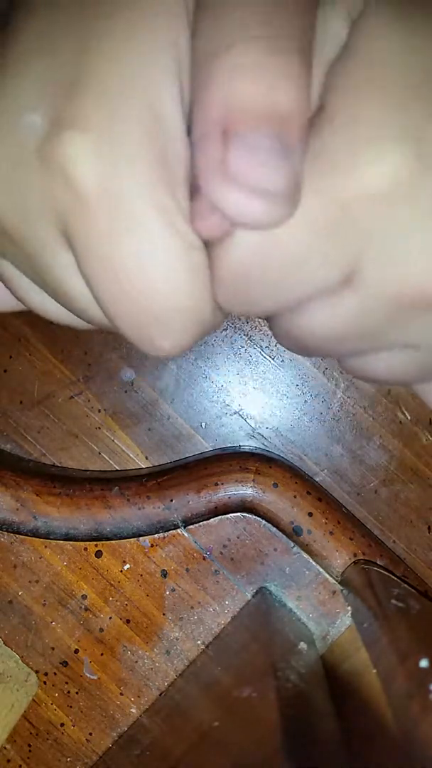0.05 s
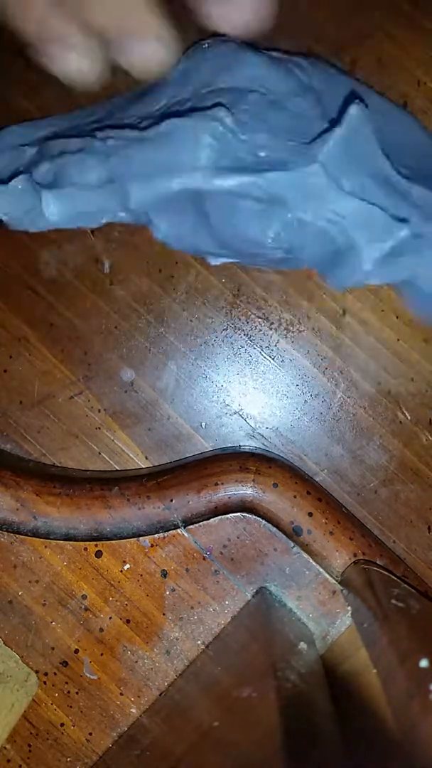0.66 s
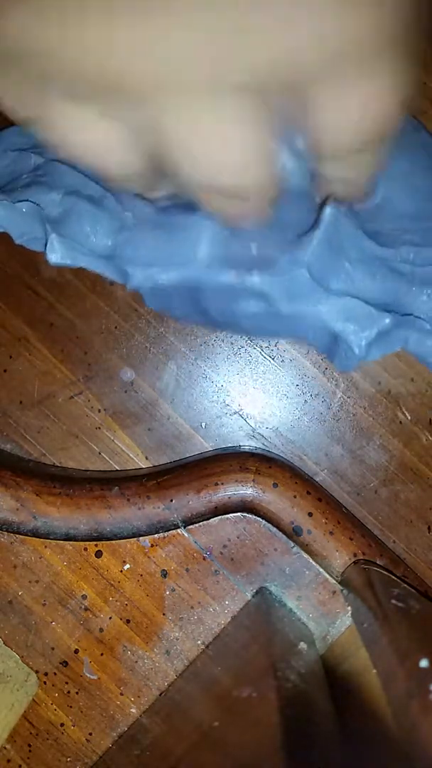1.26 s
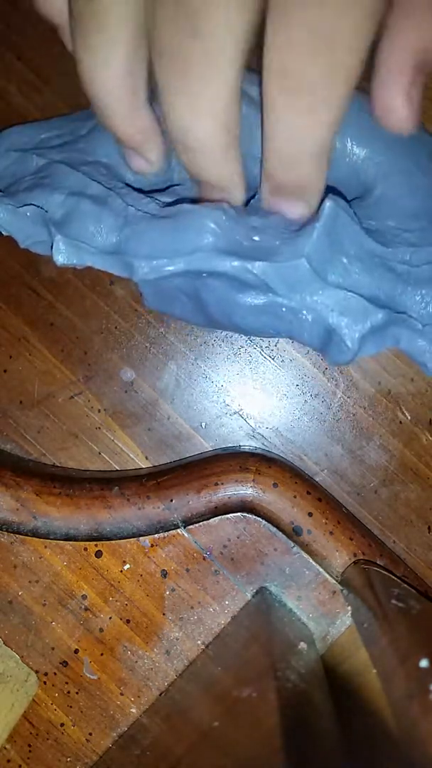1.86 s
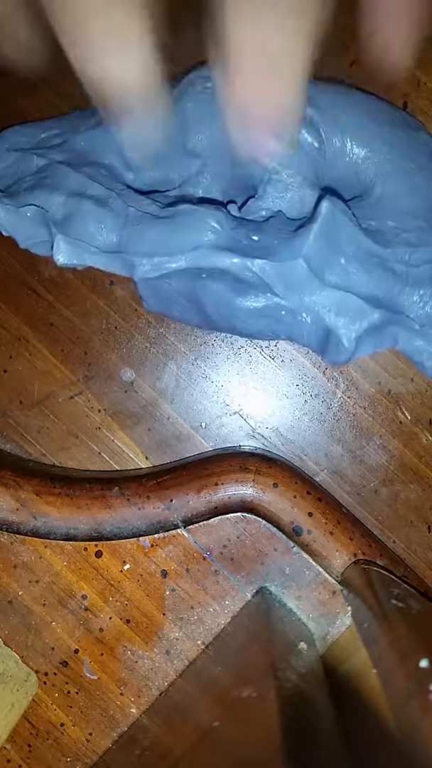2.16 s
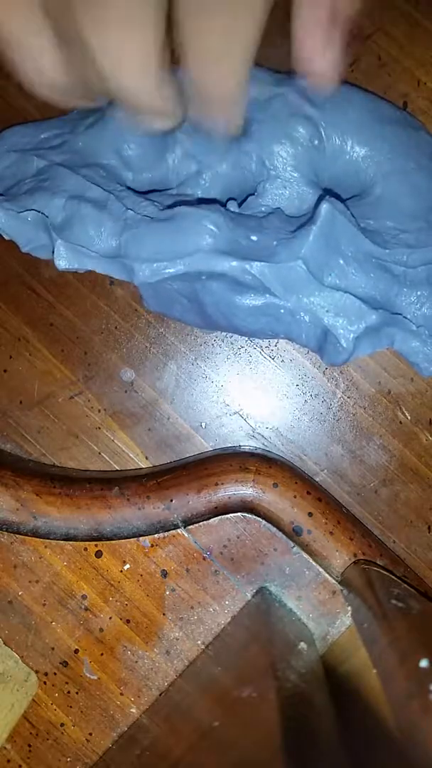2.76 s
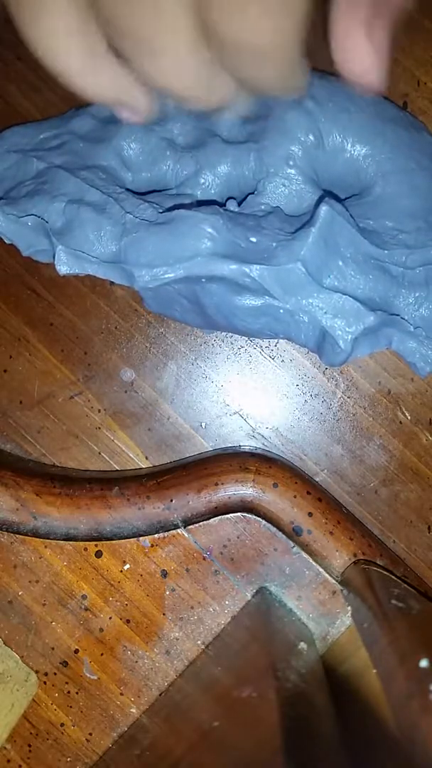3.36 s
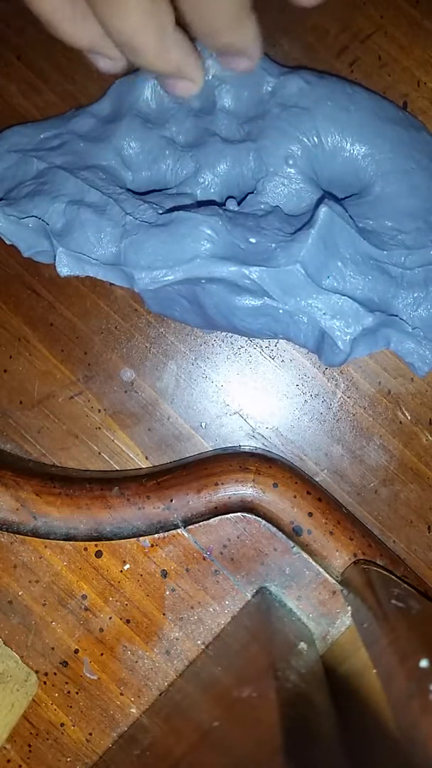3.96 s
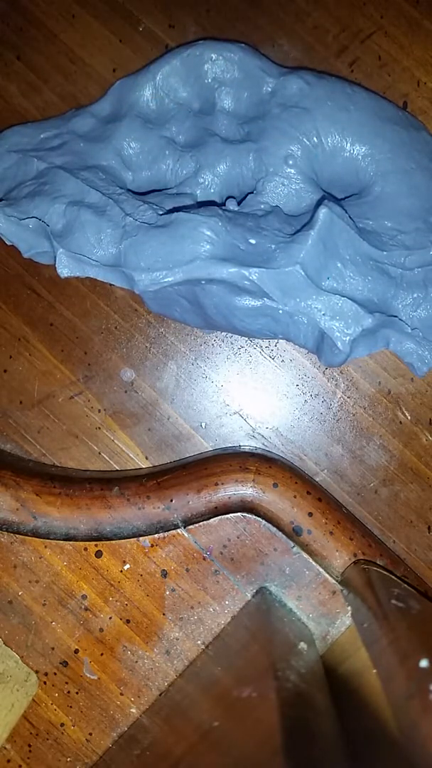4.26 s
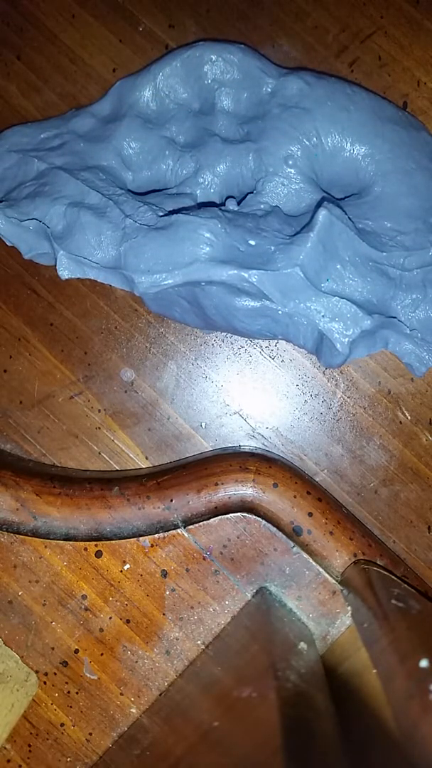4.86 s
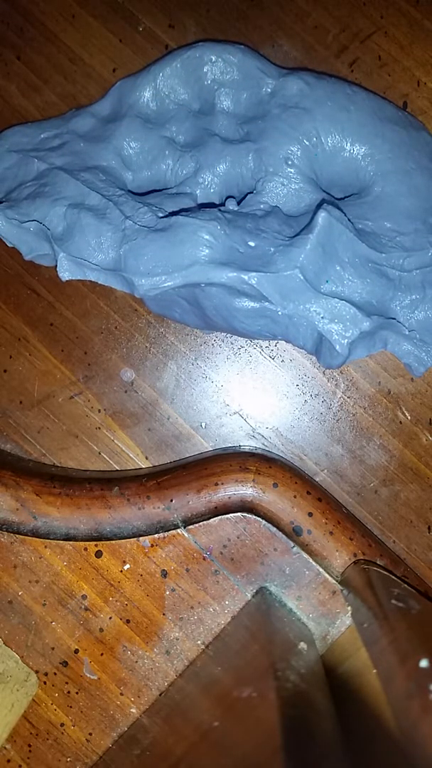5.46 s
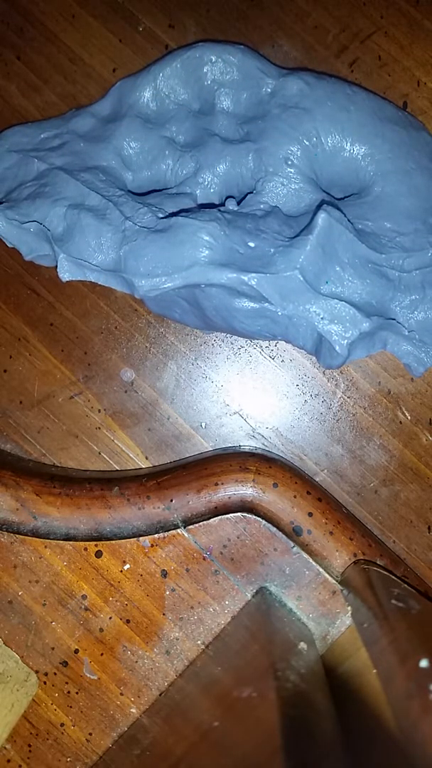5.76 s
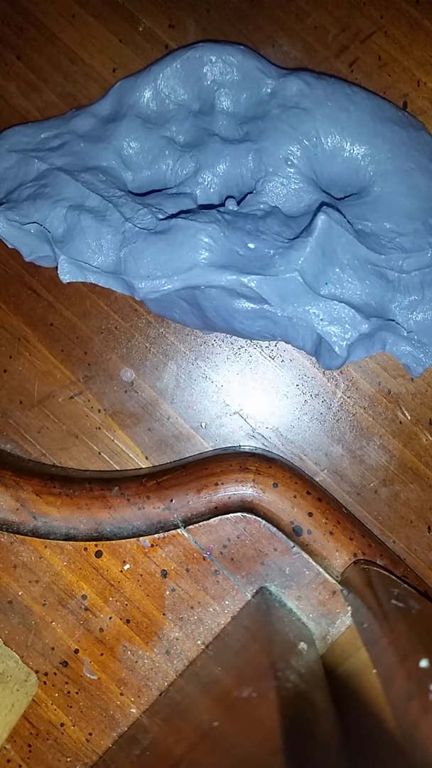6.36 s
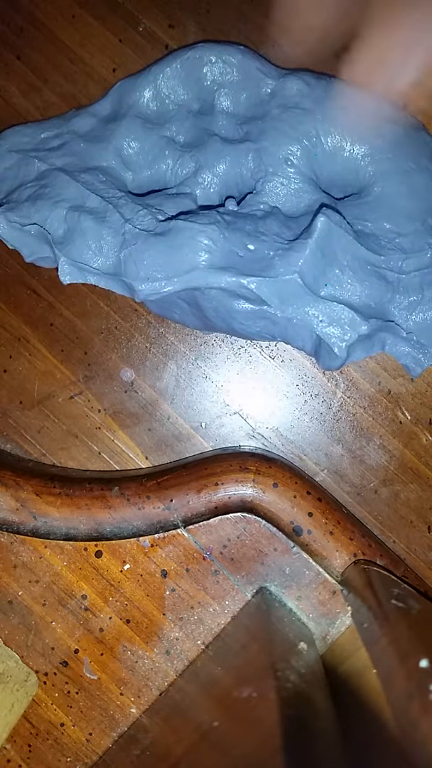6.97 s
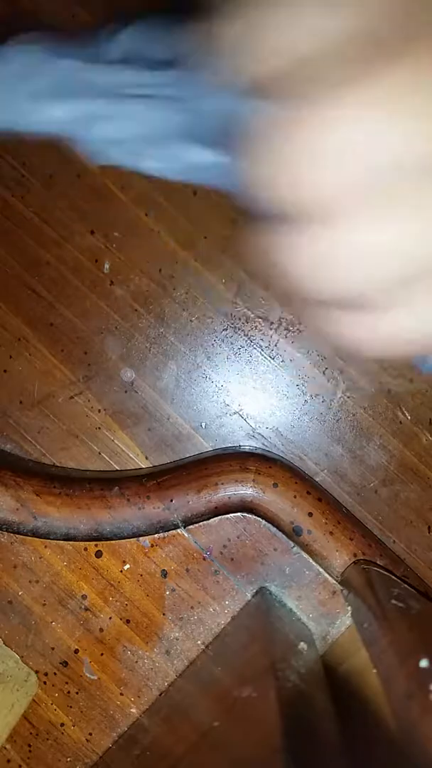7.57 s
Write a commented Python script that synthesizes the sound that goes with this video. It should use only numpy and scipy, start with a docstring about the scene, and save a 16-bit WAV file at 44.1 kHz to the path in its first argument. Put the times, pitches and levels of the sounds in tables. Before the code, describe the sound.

Hands work slime close to the microphone in a small room, over a low appliance hum and steady rush of air that dip and recover a few times in the first half. A quick cluster of sticky snaps and pops comes at about 0.2 seconds, followed by a faint sliding squish. From 1.4 to 3.5 seconds fingers press repeatedly, thudding dully through a wooden table, with hollow squelches at 1.4, 2.4 and 2.8 seconds, the middle one strongest. From 3.3 to 4 seconds the slime peels away in fine wet crackles and sharp snaps. Between 4.6 and 5.9 seconds about six small air pockets pop with a short ring, amid more crackling. It grows quieter, with one sharp tick at 6.5 seconds. Two more thuds land at 7.1 and 7.4 seconds, with a light squelch, and a wet snapping pop follows at 7.6 seconds.

```python
"""Slime on a wooden table

Hands squeeze and poke a lump of slime, close to a two-port microphone. Sticky films snap
and peel away in a fine crackle, air pockets pop, larger hollows squelch, and the presses
thud through the table top. An appliance hums and blows steadily in the small room; a drawn
curve plays the microphone's automatic gain, turning that background down and back up."""
import sys
import numpy as np
from scipy import signal
from scipy.fft import rfft, irfft
from scipy.io import wavfile
from scipy.ndimage import uniform_filter1d, minimum_filter1d

SR = 44100
rng = np.random.default_rng(int(sys.argv[2]) if len(sys.argv) > 2 else 0)


def digitize_waveform(pressure):
    """Quantize a signal to 16-bit integers and store it at the path in sys.argv[1].

    Rows of a 2-D input are taken as channels; values are limited to [-1, 1].
    """
    field = np.atleast_2d(pressure).T
    bounded = np.clip(field, -1, 1)
    quanta = np.round(bounded * 32767).astype(np.int16)
    wavfile.write(sys.argv[1], SR, quanta)


N = 339570
TIME = np.arange(N) / SR

# decay of the small room: (frequency [Hz], t60 [s])
ROOM_DECAY = [(100, 0.31), (1000, 0.22), (5000, 0.18), (14000, 0.26)]
# the microphone's automatic gain turns the steady hum and air down and back up: (time [s], level [dB])
BACKGROUND_DUCKING = [(0, -11.5), (.17, -7.5), (1.05, -6.5), (1.4, -.5), (2.36, -1), (2.385, -6),
                      (2.52, -2.5), (3.12, -7), (3.42, -1.07), (7.7, -.2)]
# rush of air, a list per port, left then right: (frequency [Hz], level [dB per Hz])
AIR_SPECTRUM = [
    [(15, -77), (75, -65.5), (170, -58), (270, -62), (490, -69.5), (860, -64), (1500, -79), (2500, -84),
     (3150, -95.5), (3800, -77.5), (4500, -72.5), (5500, -89), (6600, -103), (7500, -130), (12000, -107)],
    [(15, -88), (80, -66), (160, -67), (380, -65), (470, -72.5), (850, -82.5), (1700, -85.5), (2600, -91),
     (3200, -101), (6000, -107), (7200, -128), (9800, -121), (12200, -96), (16000, -113)],
]
# how alike the air is at the two ports: (frequency [Hz], coherence [0-1])
AIR_COHERENCE = [(30, 0.57), (100, 1), (300, 0.67), (600, 0.053), (1500, 0.083), (4000, 0.017)]
# part of the air that is ducked extra deep: (frequency [Hz], share [0-1])
AIR_DEEP_SHARE = [(1200, 0.016), (2000, 0.47), (3100, 0.33), (4000, .02), (5300, .1), (6500, 0.84)]
# appliance tones: (frequency [Hz], left level [dB], right level [dB], left phase lead [rad])
HUM_TONES = [(26, -44, -59, 0), (55.4, -42, -45, -1.6), (107.1, -27.5, -26, -0.63),
             (212.9, -43.5, -36.5, 0.77), (292.9, -44, -43.5, 0.31), (317, -67, -63.5, 0),
             (364, -54.5, -64, -0.62), (589, -46, -69, -2)]
# modes of the table top: (frequency [Hz], level [dB], t60 [s])
TABLE_MODES = [(43.5, -10.5, 0.35), (64, -22, 0.087), (95, -0.5, 0.16), (135.6, 0.5, 0.098),
               (168.4, -2.5, 0.097), (203.6, -1, 0.074), (276.3, -3.5, 0.1), (358, -11.5, 0.08)]
# presses into the table, a high corner being abrupt: (time [s], level [dB], corner [Hz], shudder [s])
PRESSES = [(.51, -24.5, 129, 0.13), (1.378, -14, 220, 0.058), (1.645, -11, 80, 0.023),
           (2.169, -18.5, 100, .05), (2.378, -1.5, 324, .028), (2.638, -19.5, 79, 0.028),
           (2.799, -6.5, 290, .02), (2.995, -15, 109, .045), (3.181, -15, 108, 0.016),
           (3.55, -22.5, 50, .03), (7.139, -13, 136, 0.062), (7.426, -6, 251, 0.029)]
# fingers land, palm follows, slime settles: (delay [s], level [dB], corner [ratio], shudder [ratio])
PRESS_STAGES = [(0, 1, 0.96, 1), (.04, -4.5, 0.47, 1), (.09, -19.5, .4, 1.6)]
# fingers drive air from a large hollow: (time [s], level [dB], base pitch [Hz], tilt [dB per octave])
HOLLOW_SQUEEZES = [(1.3711, -7.5, 556, -3.5), (2.3717, -5.5, 490, -4), (2.7961, -15, 425, -14),
                   (7.4222, -18.5, 492, -2)]
# modes of such a hollow: (pitch [ratio], level [dB], t60 [s], delay [s])
HOLLOW_MODES = [(1.001, 2, 0.013, 0.0005), (1.35, -2.5, 0.015, 0.0017), (1.7, 0, 0.03, .005),
                (2.12, -2, 0.014, 0), (2.7, -14, 0.018, .004), (5.4, -26, .006, 0)]
# air pockets bursting, and the ringing bodies of the sharp film snaps near 0.21, 0.25 and 7.58 s: (time [s],
# level [dB], pitch [Hz], t60 [s])
POPS_AND_SNAP_BODIES = [(.1722, -24, 1600, 0.0023), (.2129, -13.5, 1190, 0.0065), (.2472, -15.5, 1250, 0.0024),
                        (1.387, -27, 3200, 0.0061), (1.6327, -25.5, 2800, 0.0062), (3.2157, -30.5, 890, 0.021),
                        (3.936, -13, 930, 0.013), (4.6085, -21, 846, 0.041), (4.8096, -21, 843, 0.049),
                        (4.9981, -24, 797, 0.036), (5.2112, -14.5, 811, .034), (5.4312, -23, 847, 0.035),
                        (5.8722, -17.5, 813, 0.034), (7.582, -19, 1105, 0.0067)]
# tone of a snapping film, a list per port, left then right: (frequency [Hz], level [dB])
FILM_SPECTRUM = [
    [(300, -31), (1200, -9), (2000, -2.5), (3000, -10), (5000, -4.5), (6500, -18), (8400, -32),
     (10600, -14.5), (13000, -1.5), (16000, -8.5)],
    [(300, -40), (1200, -21), (2000, -15.5), (3000, -16), (4800, -15.5), (6000, -18), (7200, -30),
     (9200, -27.5), (10800, -9), (12200, 3), (16000, -14)],
]
# films snapping: (time [s], level [dB], left minus right [dB], wet body gain [dB], peel time [s])
FILM_SNAPS = [(.1723, -36, 3, -9, .01), (0.2136, -21.5, 3, -1.5, 0.031), (0.2477, -25, -3, -8, .035),
              (1.3704, -38, 5, 11.5, .05), (1.403, -40, 0, 1, .06), (1.6324, -40, 7, 6.5, .01),
              (1.7609, -44, -13, 3, .01), (1.8028, -32.5, -7, -11, .005), (1.9909, -47, 3, 1, .005),
              (2.1478, -42, 12, -1, .005), (2.4247, -32.5, -9, -7, 0.0085),
              (2.4646, -37.5, 3.5, -5, 0.0092), (2.7876, -50, 3, -4.5, .01), (2.8614, -46, 8, -8, .01),
              (2.87, -44, 10, 0, .02), (3.0849, -52, 9, -2, .01), (3.2127, -51, -13, 0, 0.045),
              (3.2675, -48, 6, -8, .03), (3.3014, -43, -24, 9.5, 0.022), (3.333, -30.5, -8, 4, .1),
              (3.3603, -36, -11, 3, .06), (3.378, -31.5, -8, 4, 0.12), (3.5319, -44, -13, -2, .02),
              (3.7025, -41, -14, 10, .12), (3.784, -35, -14, -4, .02), (3.795, -22.5, -6, 5, .04),
              (3.804, -19.5, -10, 6.5, .035), (3.845, -25, -6, -8, .045), (3.9364, -32, -6, 5.5, .08),
              (3.9647, -33, -12, 9, 0.14), (4.0743, -37, -10, -5, 0.065), (4.6097, -36.5, -7, 1, 0.11),
              (4.8094, -33, -5, 6, .02), (4.817, -26.5, -6, -1, .06), (4.874, -33.5, -7, 7, .03),
              (5.007, -27.5, -5.5, 3, .07), (5.22, -33.5, -7, 7.5, 0.1), (5.443, -29, -8, 2, 0.06),
              (5.6276, -46, -14, -2, .02), (5.671, -32, -8, 0, 0.06), (5.8234, -33, -10, 4, 0.074),
              (5.872, -36.5, -4, -12, .08), (5.9519, -45, -8.5, -2, .02), (6.0511, -46.5, -12, -1, 0.1),
              (6.5258, -22.5, -9, -8, 0.023), (6.8344, -46, -6, 2, .04), (7.0439, -42, -9, -1, .05),
              (7.1068, -37.5, -1, 10, .01), (7.219, -48, -12, 5, 0.18), (7.3272, -47.5, -12, 2, .06),
              (7.3534, -41, -10, -1, 0.21), (7.5829, -19.5, 2.5, 2, 0.087)]


def amp(db):
    """Decibels to gain."""
    return 10 ** (np.asarray(db) / 20)


def pan(db):
    """Left and right gains, with the left louder by db."""
    return amp([[db / 2], [-db / 2]])


def unit(x):
    """Scales to rms 1."""
    return x / np.sqrt(np.mean(x ** 2) + 1e-20)


def curve_at(points, hz):
    """Reads a curve on a log-frequency axis."""
    knots_hz, values = np.transpose(points)
    return np.interp(np.log(hz + 1), np.log(knots_hz), values)


def add(mix, start, sound):
    """Mixes in a stereo sound at a start time in seconds."""
    part = mix[:, max(round(start * SR), 0):][:, :sound.shape[1]]
    part += sound[:, :part.shape[1]]


def drift(rate_hz):
    """Slow random wander of rms 1."""
    hz = np.fft.rfftfreq(N, 1 / SR)
    return unit(irfft(rfft(rng.standard_normal(N)) / (1 + (hz / rate_hz) ** 4), N))


def impulse(spectrum, size=1024):
    """Sharp-fronted, minimum-phase click with the given spectrum."""
    log_gain = np.log(amp(curve_at(spectrum, abs(np.fft.fftfreq(size, 1 / SR)))))
    return np.fft.ifft(np.exp(signal.hilbert(log_gain).conj())).real


def room(x, wet_db):
    """Adds a diffuse tail, different at each port, each band dying at its own speed."""
    hz, t, noise = signal.stft(rng.standard_normal((2, SR // 2)), SR, nperseg=256)
    decay = amp(-60 * t / curve_at(ROOM_DECAY, hz)[:, None])
    attack = 1 - np.exp(-t / 0.0085)
    tail = signal.istft(noise * decay * attack, SR, nperseg=256)[1]
    return x + amp(wet_db) * signal.fftconvolve(x, tail / np.linalg.norm(tail[0]), axes=1)[:, :N]


def ducking():
    """The microphone's automatic gain on the background, as a drawn curve."""
    return amp(np.interp(TIME, *np.transpose(BACKGROUND_DUCKING)))


def air(flutter_db=0.68, deep_power=3.4, boom_hz=203.8, boom_width_hz=12.7, boom_db=14):
    """Rushing air stirs a room resonance; it is alike at both ports only in the bass."""
    hz = np.fft.rfftfreq(N, 1 / SR)
    left, other = rfft(rng.standard_normal((2, N))) * np.sqrt(SR / 2)
    coherence = np.clip(curve_at(AIR_COHERENCE, hz), -1, 1)
    right = coherence * left + np.sqrt(1 - coherence ** 2) * other
    boom = boom_db / (1 + (2 * (hz - boom_hz) / boom_width_hz) ** 2)
    rush = amp([curve_at(port, hz) + boom for port in AIR_SPECTRUM]) * np.array([left, right])
    deep_share = np.clip(curve_at(AIR_DEEP_SHARE, hz), 0, 1)
    body = irfft(rush * (1 - deep_share), N) * ducking()
    hiss = irfft(rush * deep_share, N) * ducking() ** deep_power
    return (body + hiss) * amp(flutter_db * drift(rate_hz=11))


def hum(waver_db=0.8, wander_s=0.0012, duck_power=0.99):
    """Motor and mains tones waver slightly; higher ones wander more in phase."""
    out = np.zeros((2, N))
    sway, waver = drift(rate_hz=1.2), drift(rate_hz=2.7)
    for hz, left_db, right_db, lead in HUM_TONES:
        phase = 2 * np.pi * (hz * TIME + rng.random()) + wander_s * hz * sway
        out += amp([[left_db], [right_db]]) * np.sin([phase, phase - lead])
    return out * amp(waver_db * waver) * ducking() ** duck_power


def thuds(right_db=-14, shudder=0.061, lowest_hz=55, lag_s=0.00058, rebound_ratio=0.43):
    """Each stage of a press is a soft push and a dying shudder of the hand, ringing the table top."""
    out, t = np.zeros((2, N)), np.arange(SR // 2) / SR
    port_time = np.maximum(t - np.array([[0], [lag_s]]), 0)  # the far port hears it later
    wood = sum(amp(db - 60 * t / t60) * np.sin(2 * np.pi * hz * port_time)
               for hz, db, t60 in TABLE_MODES)
    # the board radiates little deep bass
    wood = signal.lfilter(*signal.butter(3, lowest_hz, "high", fs=SR), wood)
    pushes = [(start + delay, db + stage_db, corner_hz * softer, shudder_s * longer)
              for start, db, corner_hz, shudder_s in PRESSES
              for delay, stage_db, softer, longer in PRESS_STAGES]
    for start, db, corner_hz, shudder_s in pushes:
        force = shudder * rng.standard_normal(len(t)) * np.exp(-(t / shudder_s) ** 2)
        force[0] = 1
        push = signal.lfilter(*signal.butter(2, corner_hz, fs=SR), force)
        # a quick hand rebounds and moves less bass
        push = signal.lfilter(*signal.butter(1, rebound_ratio * corner_hz, "high", fs=SR), push)
        thud = signal.fftconvolve(push[None], wood, axes=1)[:, :len(t)]
        add(out, start, amp(db) * amp([[0], [right_db]]) * thud / abs(thud).max())
    return out


def slide(start_s=0.43, length_s=0.36, hiss_db=-61, squish_db=-51, squish_hz=(400, 1600), right_db=-8):
    """The palms slide off the slime: a soft, dull squish, then a faint hiss."""
    out, t = np.zeros((2, N)), np.arange(round(length_s * SR)) / SR
    hiss = np.array([unit(signal.lfilter(impulse(port), 1, rng.standard_normal(len(t))))
                     for port in FILM_SPECTRUM])
    band = signal.butter(4, squish_hz, "band", fs=SR)
    squish = unit(signal.lfilter(*band, rng.standard_normal(len(t))))
    squish *= np.sin(2 * np.pi * np.minimum(t / length_s, 0.5)) ** 2  # over by halfway
    add(out, start_s, amp(hiss_db) * hiss * np.sin(np.pi * t / length_s) ** 2)
    add(out, start_s, amp(squish_db) * amp([[0], [right_db]]) * squish)
    return out


def squelch_rings():
    """Squeezed air rings every mode of a hollow: (time [s], level [dB], pitch [Hz], t60 [s])."""
    return [(start + delay, db + mode_db + tilt * np.log2(ratio), hz * ratio, t60)
            for start, db, hz, tilt in HOLLOW_SQUEEZES
            for ratio, mode_db, t60, delay in HOLLOW_MODES]


def pops(rings, right_db=-13, echo_gain=0.85, scatter_s=0.0037, cutoff_ratio=1.25):
    """A burst air pocket, or the body of a snapping film, rings briefly at its own pitch; table and hand
    scatter the sound."""
    out, t = np.zeros((2, N)), np.arange(SR // 10) / SR
    for start, db, hz, t60 in rings:
        soften = signal.butter(4, min(cutoff_ratio * hz, 9000), fs=SR)
        ring = signal.lfilter(*soften, np.cos(2 * np.pi * hz * t) * amp(-60 * t / t60))
        spread_s = min(scatter_s, t60 / 2)  # the smallest pockets stay crisp
        paths = rng.standard_normal((2, len(t))) * (t / spread_s) * np.exp(-2 * t / spread_s)
        echoes = signal.fftconvolve(paths, ring[None], axes=1)[:, :len(t)]
        echoes *= echo_gain * np.linalg.norm(ring) / np.linalg.norm(echoes, axis=1, keepdims=True)
        add(out, start, amp(db) * amp([[0], [right_db]]) * (ring + echoes))
    return out


def peeling(base_db=-34.5, follow=0.65, fade_db=12, rise_s=0.008, stray_db=-75.5, stray_from_s=3.15):
    """Envelope of the crackle: slime peels on after each snap, louder after a strong one."""
    power, t = np.zeros((2, N)), np.arange(SR // 2) / SR
    for start, snap_db, pan_db, _, peel_s in FILM_SNAPS:
        attack = np.minimum(t / rise_s, 1)
        decay = amp(base_db + follow * snap_db - fade_db * t / peel_s)
        add(power, start, (attack * decay * pan(0.7 * pan_db)) ** 2)  # same side, nearer the centre
    strays = amp(stray_db) * (TIME > stray_from_s)  # stray threads, once the fingers are sticky
    return np.sqrt(power + strays ** 2)


def crackle(threads_per_s=800, spread_db=4, left_db=-2, right_db=1, clump_db=3, clump_hz=45):
    """Countless tiny threads of slime let go, in little clumps."""
    sizes = amp(spread_db * np.minimum(rng.exponential(1, N), 5) + clump_db * drift(clump_hz))
    breaks = sizes * (rng.random(N) < threads_per_s / SR)
    ports = [unit(signal.oaconvolve(breaks * rng.standard_normal(N), impulse(port))[:N])
             for port in FILM_SPECTRUM]
    return np.array(ports) * amp([[left_db], [right_db]]) * peeling()


def snaps(gain_db=3, tear_s=0.0007, scatter=0.22, scatter_s=0.003, splinter=0.031, splinter_s=0.012):
    """A film tears for a moment, breaks with a sharp tick, and smaller ticks follow."""
    out, lead = np.zeros((2, N)), SR // 256
    t = np.arange(-lead, SR // 16) / SR
    colour = np.array([impulse(port) for port in FILM_SPECTRUM])
    body_band = signal.butter(2, 7000, fs=SR)
    burst = np.exp(-abs(t) / np.where(t < 0, tear_s, scatter_s))
    for start, db, pan_db, body_db, _ in FILM_SNAPS:
        tick = scatter * rng.standard_normal((2, len(t))) * burst
        splinters = rng.standard_normal(len(t)) ** 3 * (rng.random(len(t)) < 0.1)
        tick += splinter * splinters * np.exp(-t / splinter_s) * (t > 0)
        tick[:, lead] = 1  # the break itself
        snap = signal.fftconvolve(tick, colour, axes=1)
        snap *= pan(pan_db) / np.linalg.norm(snap, axis=1, keepdims=True)
        snap *= 2.91 / np.linalg.norm(snap.mean(0))  # a peak of about 1
        snap += (amp(body_db) - 1) * signal.lfilter(*body_band, snap)  # more body sounds wetter
        add(out, start + t[0], amp(db + gain_db) * snap)
    return out


def scene():
    """Close slime and a roomier table over the bed of hum and air."""
    films = room(snaps() + crackle() + slide(), wet_db=-11.5)
    pockets = room(pops(POPS_AND_SNAP_BODIES + squelch_rings()), wet_db=-11.5)
    table = room(thuds(), wet_db=-6.5)
    return films + pockets + table + hum() + air()


def record(dry, ceiling=0.9, window=441, cutoff_hz=16100):
    """A smooth peak limiter, then a steep low-pass on the top treble."""
    allowed = np.minimum(1, ceiling / (abs(dry).max(0) + 1e-9))
    gain = uniform_filter1d(minimum_filter1d(allowed, size=window), size=window)
    lowpass = signal.firwin(401, cutoff_hz, window=("kaiser", 9), fs=SR)
    return signal.oaconvolve(dry * gain, lowpass[None], "same")


dry = scene()
out = record(dry)
digitize_waveform(out)
```